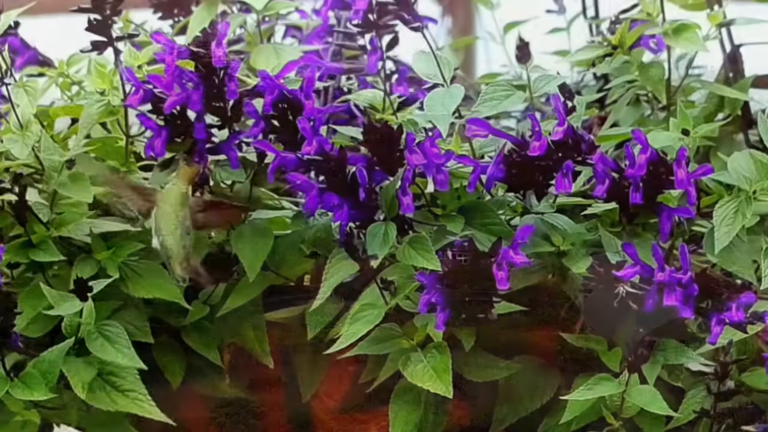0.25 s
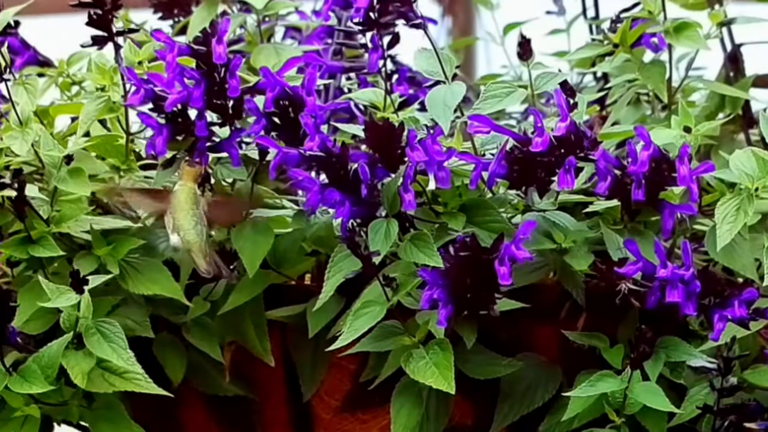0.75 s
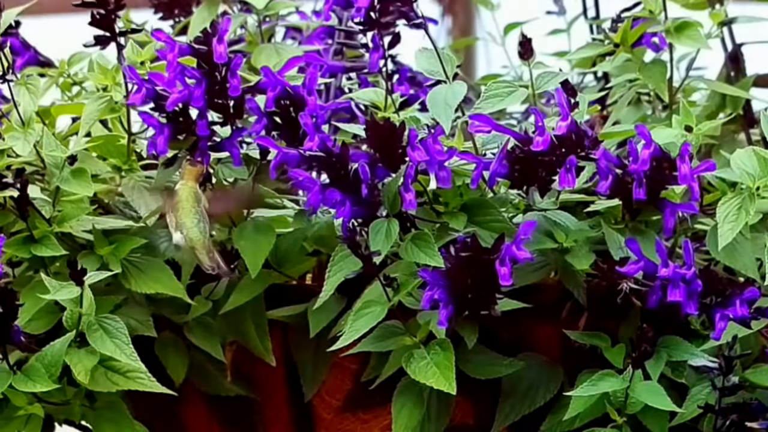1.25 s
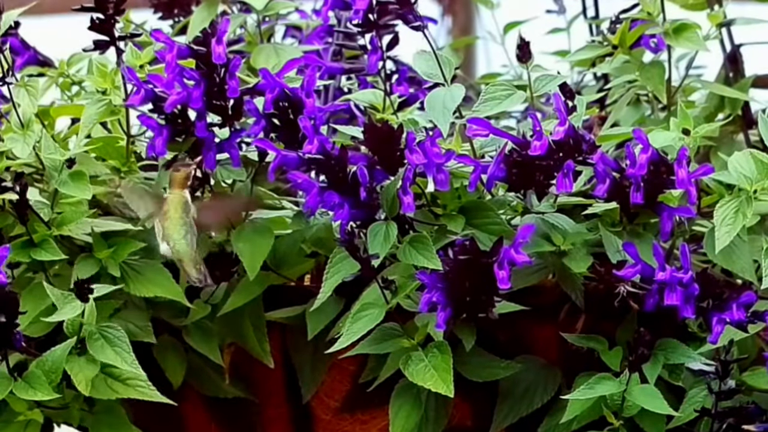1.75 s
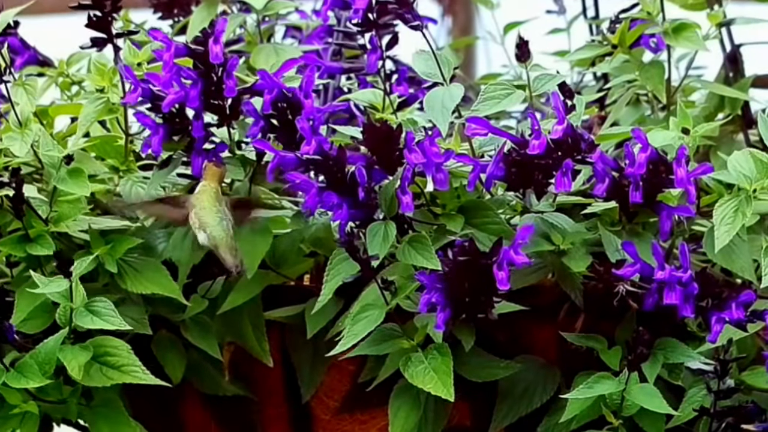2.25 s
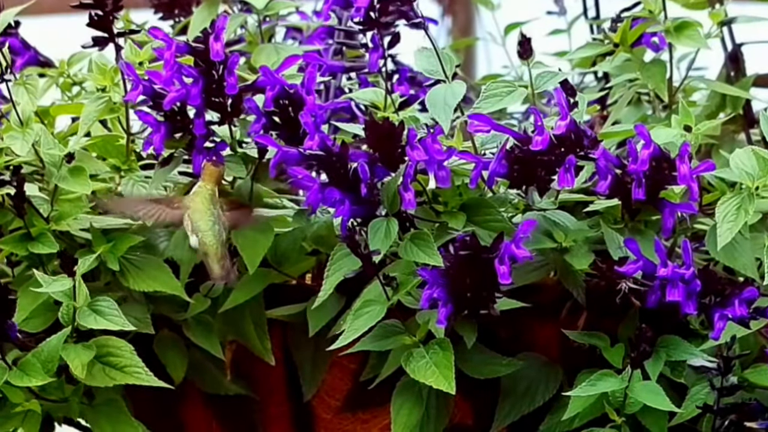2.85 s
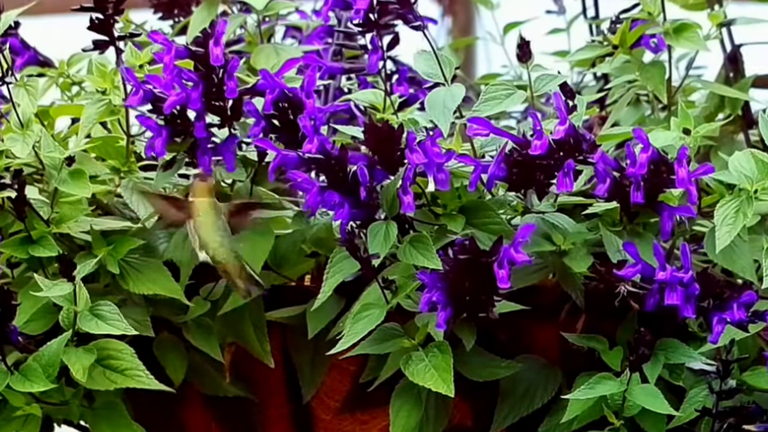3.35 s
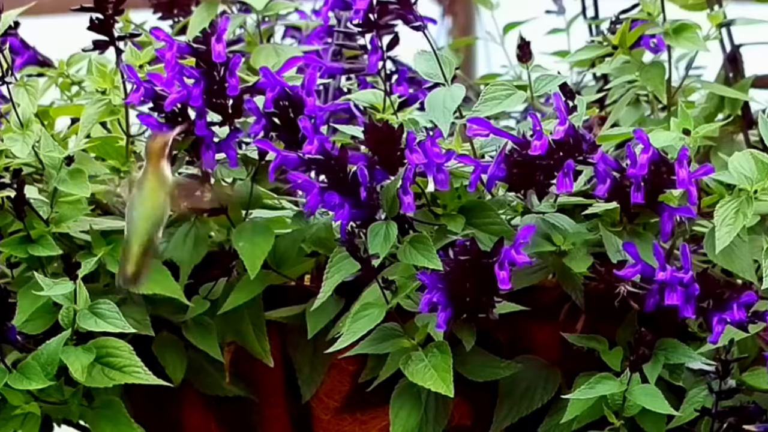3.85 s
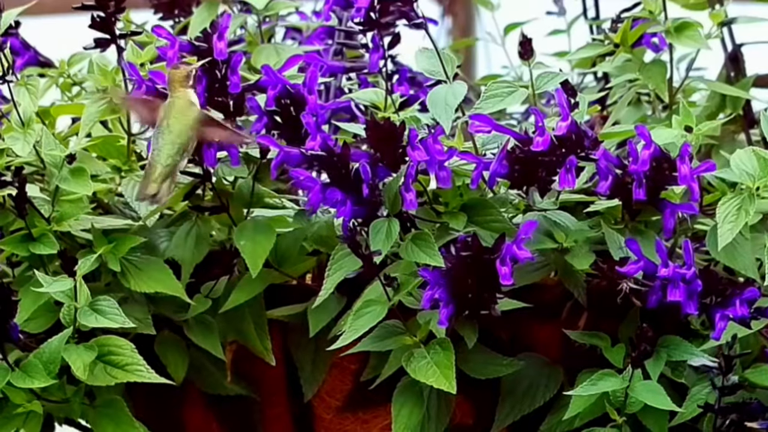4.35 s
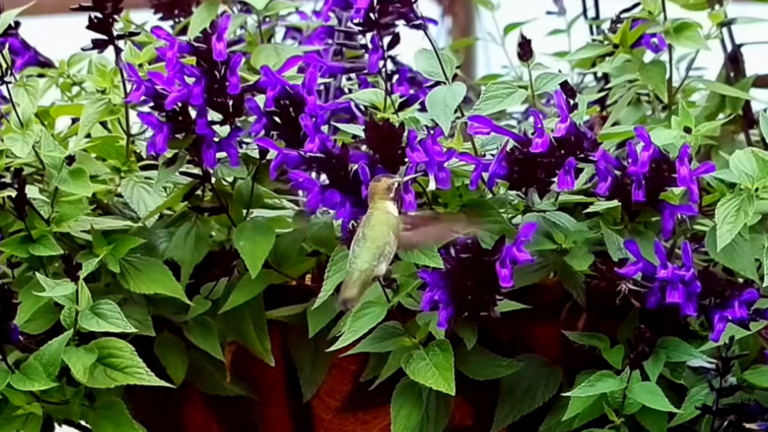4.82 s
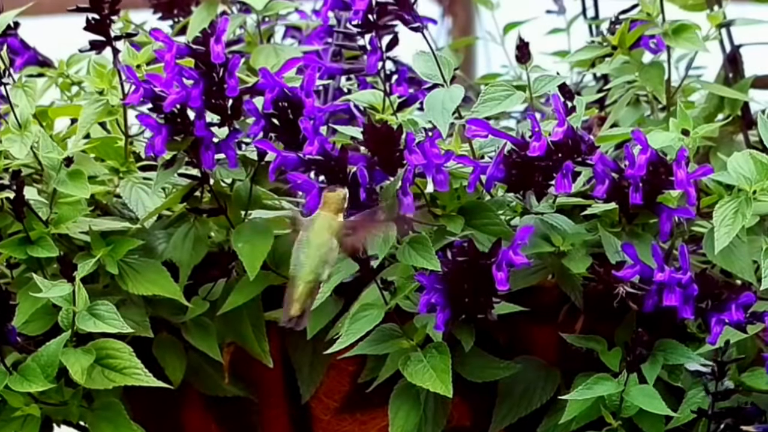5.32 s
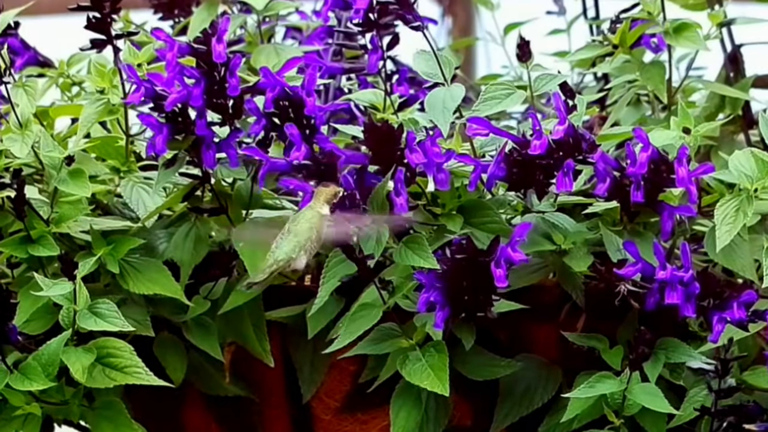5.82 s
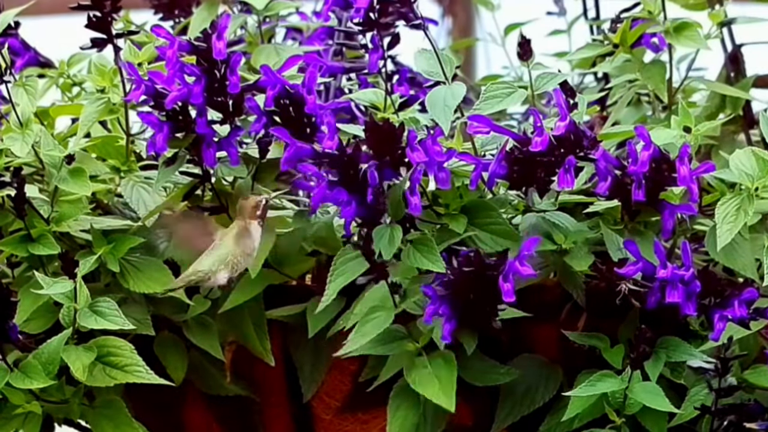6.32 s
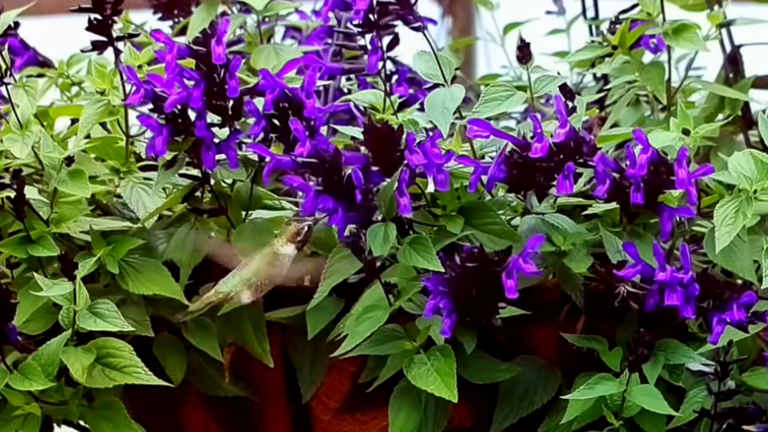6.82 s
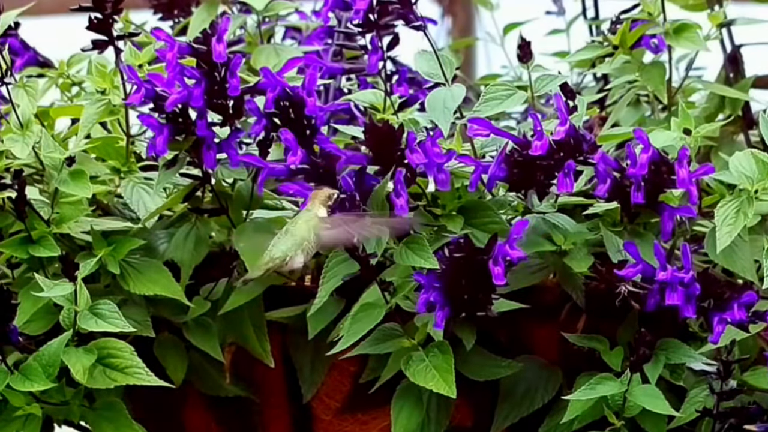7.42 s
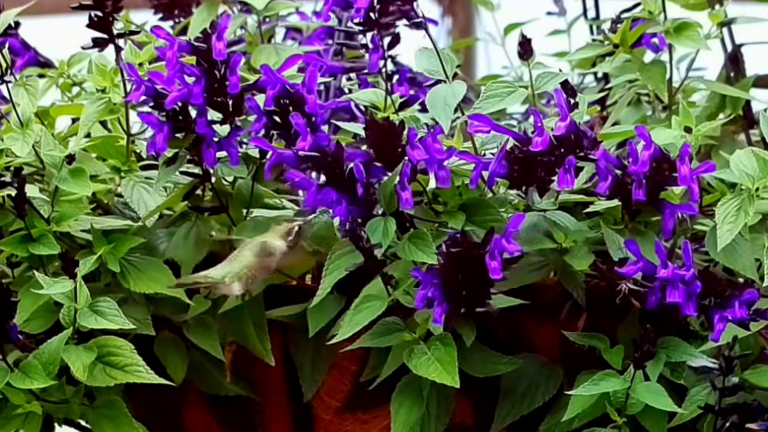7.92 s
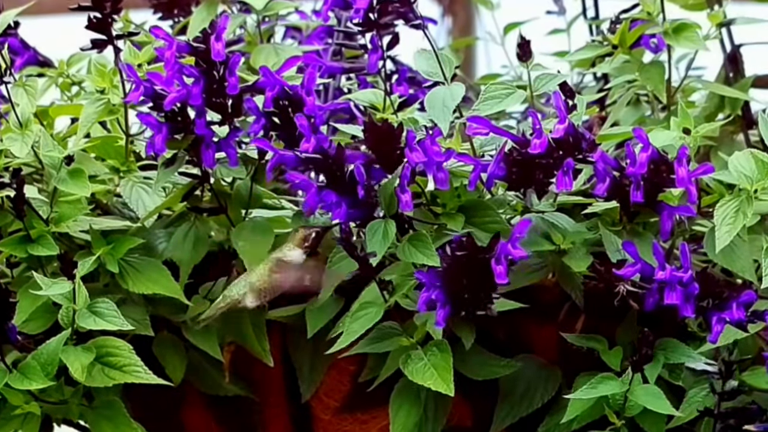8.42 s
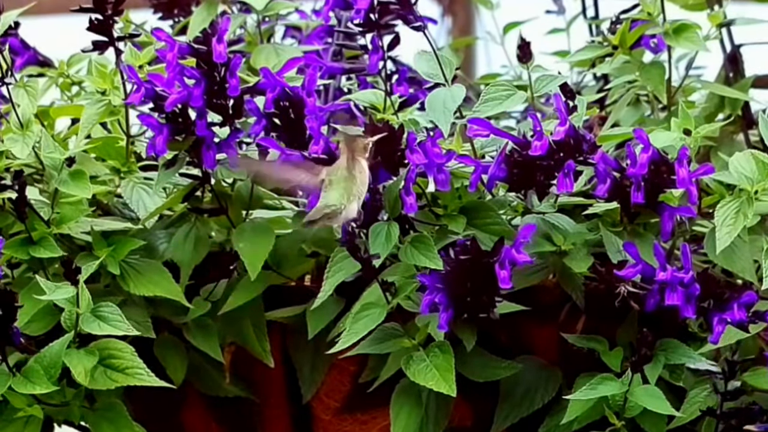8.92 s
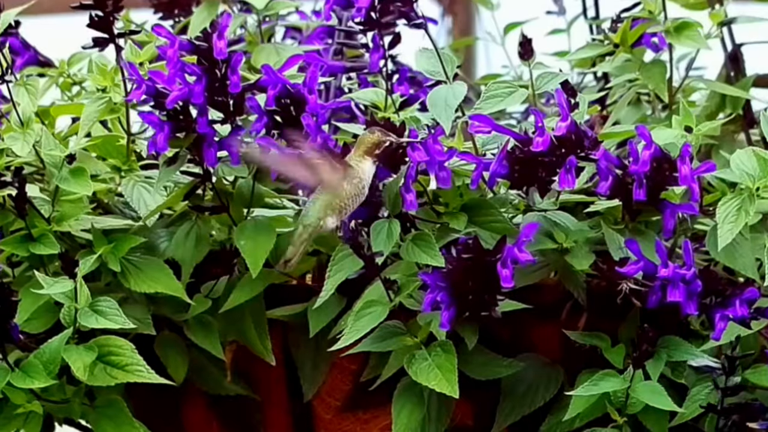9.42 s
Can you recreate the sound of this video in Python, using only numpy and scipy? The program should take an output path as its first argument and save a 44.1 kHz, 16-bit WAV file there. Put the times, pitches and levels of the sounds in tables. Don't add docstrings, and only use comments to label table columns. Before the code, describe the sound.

A hummingbird close among leaves gives five tiny, sharp, plunging chips about a quarter second apart over wide garden hiss. At one and a half seconds the hiss turns narrower and quieter, nearly empty but for faint distant peeps. From three seconds the bird sings in the centre: fast scratchy buzzes, dry clicks, rasps swelling into piercing squeaks, short whistles and doubled notes, with a light outdoor echo.

```python
import sys
import numpy as np
from scipy import signal
from scipy.fft import rfft, irfft, next_fast_len
from scipy.io import wavfile
from scipy.ndimage import uniform_filter1d, map_coordinates

SR = 44100
rng = np.random.default_rng(int(sys.argv[2]) if len(sys.argv) > 2 else 0)


def makeup_ratio(level_db):
    decades = np.asarray(level_db, float) / 20
    return 10 ** decades


def master(y):
    cut = np.clip(np.atleast_2d(y).T, -1, 1)
    pcm = np.round(cut * 32767)
    wavfile.write(sys.argv[1], SR, pcm.astype(np.int16))


N = 426447
SCENE_CHANGE_S = 1.5
MIDDLE_DB = -35
JOINED_S = 0.006

# start in seconds, end in seconds, early level in dB, late level in dB,
# opening pitch in Hz (of the low voice, for two voices).
BUZZES = [
    (3.15, 3.196, -44, -44.5, 7177),
    (3.2, 3.405, -31.5, -34, 7120),
    (3.447, 3.58, -33.5, -30, 6580),
    (3.752, 3.862, -40, -36.5, 6800),
    (4.07, 4.21, -37, -39, 6900),
    (4.21, 4.35, -35.5, -33.5, 7000),
    (4.517, 4.717, -35, -42.5, 6650),
    (4.717, 4.822, -43.5, -39, 6500),
    (6.7, 6.86, -33, -32, 6804),
    (7.03, 7.08, -32, -34.5, 6400),
]
SWELLS = [
    (3.581, 3.694, -30, -29, 6550),
    (3.862, 4.006, -31.5, -30.5, 6500),
    (4.35, 4.46, -28, -39.5, 6900),
    (6.861, 6.98, -39.5, -29, 6510),
    (7.08, 7.146, -40, -41, 6300),
    (7.15, 7.276, -32, -33.5, 6115),
    (7.318, 7.453, -34, -35, 6300),
    (7.455, 7.586, -27.5, -31.5, 6000),
]
FRAYED_BUZZES = [
    (4.93, 5.12, -54.5, -53, 6750),
    (7.66, 7.745, -43.5, -38, 6840),
    (7.745, 7.87, -38.5, -40, 6420),
    (7.89, 7.975, -41, -38.5, 5850),
    (8.06, 8.2, -50, -49, 6800),
]
RASPS = [
    (1.63, 1.71, -58, -55.5, 6700),
    (5.795, 5.935, -39.5, -32, 6380),
    (6.28, 6.383, -45, -39, 6430),
    (6.383, 6.428, -30, -35, 7030),
    (8.62, 8.78, -51, -34.5, 6600.19),
    (8.78, 8.85, -25.5, -44.5, 6850),
    (9.02, 9.131, -37, -39, 6900),
    (9.131, 9.176, -30.5, -28, 8050),
    (9.54, 9.615, -30, -39.5, 6500),
    (9.615, 9.675, -43.5, -30, 6900),
]
BURSTS = [
    (5.155, 5.185, -38.5, -53, 6000),
    (5.925, 5.963, -36.5, -21.5, 6000),
    (6.415, 6.457, -32, -22, 6000),
    (9.16, 9.205, -30, -19.5, 6000),
]
WHISTLES = [
    (5.19, 5.27, -45, -41, 8700.5),
    (5.278, 5.312, -30.5, -22.5, 8899.5),
    (5.957, 5.975, -24, -36, 9680),
    (6.447, 6.471, -19.5, -32, 9540),
    (7.728, 7.755, -30, -41, 8540),
    (9.195, 9.215, -19.5, -30, 9760),
]
WHISTLE_TAILS = [
    (5.975, 6.06, -40, -42.5, 8200),
    (6.471, 6.531, -30.5, -52, 8370),
    (8.285, 8.365, -37.5, -40.5, 9430),
    (9.215, 9.285, -34.5, -51, 8920),
]
TRILLS = [
    (5.31, 5.346, -29, -46, 8560),
    (5.346, 5.42, -37, -51, 8390),
    (5.42, 5.586, -50, -49, 8200),
]
CLOSE_DUETS = [
    (5.67, 5.795, -47.5, -44, 4530),
    (6.17, 6.29, -52, -41, 4550.5),
    (8.915, 9.035, -42, -38.5, 4743),
    (9.42, 9.545, -44.5, -36.5, 4420),
]
WIDE_DUETS = [
    (5.12, 5.185, -42, -38, 3484),
    (8.225, 8.29, -53, -35, 2706),
]

# level in dB of an
BUZZ_MANNER = dict(attack_s=0.0077, release_s=0.01416, edge_db=15.5, rest_hz=6300, settle_s=.6, colours=[(-7.5, -0.21),
               (-0.2, -.005)])
SWELL_MANNER = dict(attack_s=.012, release_s=0.017, edge_db=13.5, rest_hz=6300, settle_s=.6, colours=[(-9.5, -0.34),
                (0.09, -.001)])
FRAYED_MANNER = dict(attack_s=0.0031, release_s=0.012, edge_db=10, rest_hz=6700, settle_s=0.24, colours=[(-9.5, -.1),
                 (0.63, 0.0076)])
RASP_MANNER = dict(attack_s=0.0066, release_s=0.0023, edge_db=9, rest_hz=7130, settle_s=0.24, colours=[(-7.5, -.1),
               (0.6, -.001)])
BURST_MANNER = dict(attack_s=.003, release_s=0.015, edge_db=9, rest_hz=6000, settle_s=.2, colours=[(-5.5, -0.76),
                (0.2743, -.001)])
WHISTLE_MANNER = dict(attack_s=0.0075, release_s=0.0027, edge_db=9, rest_hz=8200, settle_s=0.11, colours=[(-26.5, -0.44),
                  (-17, -0.33)])
TAIL_MANNER = dict(attack_s=0.0041, release_s=.018, edge_db=9, rest_hz=8020, settle_s=0.037, colours=[(-27.5, -0.31),
               (-11, -.3)])
TRILL_MANNER = dict(attack_s=0.0029, release_s=0.0096, edge_db=10, rest_hz=9800, settle_s=0.18, colours=[(-24, -1.56),
                (-19.5, -0.75)])
# high voice in Hz, sum tones in dB.
CLOSE_MANNER = dict(attack_s=0.0076, release_s=.011, edge_db=9, rest_hz=4500, settle_s=.08, colours=[(5248.5, 12.5),
                (-0.5, -0.26)])
WIDE_MANNER = dict(attack_s=0.013, release_s=.004, edge_db=3.5, rest_hz=3770, settle_s=0.06, colours=[(5210, 3),
               (5.9, 0.17)])

# time in seconds, peak level in dB, ring in Hz.
CLICK_EVENTS = [(3.0833, -39, 6370), (3.1155, -30.5, 7670), (3.1494, -32, 6800), (4.0896, -24, 6700),
                (4.124, -19, 6940), (4.1715, -16, 6910), (4.5262, -22.5, 6390), (4.554, -38, 6240),
                (4.8, -19, 6540), (4.8197, -28.5, 6650), (5.0059, -41, 6570), (5.048, -39, 6500),
                (5.899, -18.5, 8520), (6.3868, -23.5, 6720), (6.6457, -31, 6800), (6.6795, -23.5, 6410),
                (6.713, -25.5, 6720), (7.0326, -24.5, 6600), (7.8818, -13.5, 4030), (7.9584, -23.5, 7270),
                (8.4588, -32.5, 4740), (8.6544, -32, 6900), (9.1364, -14, 8130), (9.654, -21.5, 8500)]
# start in seconds, length in seconds, start Hz, end Hz, level in dB.
SOFT_NOTES = [(0.688, 0.051, 2310, 2270, -63.5), (0.849, 0.054, 2300, 2480, -57),
              (0.973, 0.055, 3540, 3460, -51), (1.108, 0.035, 8380, 8280, -49.5),
              (1.66, 0.04, 9500, 9700, -52.5), (2.462, 0.071, 6540, 6900, -52),
              (4.643, 0.094, 2560, 2940, -55.5), (4.736, 0.039, 2307, 2500, -52.5),
              (4.783, 0.037, 2376, 2350, -51), (7.891, 0.037, 2303, 2414, -49.5),
              (8.098, 0.025, 12430, 12200, -55)]

# start in seconds, peak in dB, time stretch, left-right in dB, air puff in dB.
CHIP_EVENTS = [
    (0.2356, -8, 0.99, -0.5, -21),
    (0.492, -8.5, 1, -1, -10.5),
    (0.767, -7, 1, -1.0, -28),
    (1.0175, -7, 1, -1.5, -18),
]
EARLIER_CHIP = (-.012, -12, 1, -1.5, -20)
BREATHY_CHIPS = [
    (1.2869, -7.5, 0.96, -1.3, -5.5),
]
# time in ms, pitch in Hz, level in dB.
CHIP_COURSE = [(0, 9270, -33.5), (.6, 8800, -12), (3.2, 8100, -5.5), (5.5, 7100, -5.5), (7.3, 5300, -5),
               (9, 4640, -15), (10.8, 3100, -14.5), (12, 3800, -42)]

# frequency in Hz, level in dB.
THROAT_DB = [(2000, -35), (3200, -19.5), (4400, -8.5), (4900, -1), (9000, -2.5), (13000, -6.5),
             (16000, -14)]
SWELL_THROAT_DB = [(4200, 0), (7300, -0.2), (8100, -8), (9500, -7.5), (10500, 1), (15000, 3.5)]
BREATH_DB = [(2400, -40), (3000, -9.5), (4400, -3.5), (4900, -3.5), (7800, 3), (9200, -6), (10500, -47)]
FIZZ_DB = [(8200, -71), (9200, 2), (10300, -3.5), (13000, 0.5), (14200, -15), (16000, -5)]
FIRST_MIC_DB = [(300, -49.5), (1800, -35), (2300, -7), (12000, 3.5), (13500, -15.5), (16000, -41)]
NEAR_AIR_DB = [(18, -17), (30, -28), (59, -45.5), (988, -7.5), (2830, -0.5), (5590, 1.5), (9970, -1.5),
               (16000, -15)]
FAR_AIR_DB = [(18, -116), (30, -49), (649, -30.5), (1040, -18), (1720, -9), (2600, -4), (3980, -4),
              (16000, -16)]

# time in seconds, level in dB.
FAR_LEVEL_DB = [(1.5, -65.5), (1.84, -68.5), (3.07, -67), (3.32, -64.5), (5.64, -63.5), (6.101, -62.5),
                (6.65, -60.5), (7.98, -60), (8.53, -61.5), (9.35, -61.5), (9.67, -61)]
# frequency in Hz, 60 dB decay in seconds.
LEAVES_T60_S = [(2000, 0.3), (5000, 0.098), (8000, 0.14), (11000, .12), (14000, 0.16)]
# frequency in Hz, 60 dB decay in seconds.
YARD_T60_S = [(2000, 0.55), (7000, 0.43), (14000, 0.055)]
# delay in ms, size.
HOUSING_COPIES = [(1.124, -0.09), (1.212, 0.1), (1.448, 0.1), (1.804, 0.07), (1.994, -0.07), (2.116, 0.06),
                  (3.004, -0.08), (3.332, 0.08), (3.508, 0.07)]


def buzz(tables, rate_hz, jitter, sharp, airy, white):
    gain, hz, upper_db, scatter = syllables(tables)
    scatter = np.abs(scatter)
    count = beats(rate_hz, jitter)
    jump = rng.standard_normal(N // 20)[count.astype(int)]
    bend = scatter * (0.3 * jump + 0.5 * wobble(120) + 0.4 * wobble(900))
    tone = spin(hz * np.exp(bend)).real
    upper = spin(1.8 * hz * np.exp(0.37 * bend + 0.036 * wobble(1200))).real
    air_share = np.clip(airy * scatter, 0.03, 0.9)
    low = np.sqrt(2 - 2 * air_share) * tone + np.sqrt(air_share) * unit(coloured(white[0], BREATH_DB))
    high = 1.66 * upper + 1.27 * unit(coloured(white[1], FIZZ_DB))
    gate = throb(count, sharp, size_db=2.0) * (1 - air_share) + air_share
    return gain * makeup_ratio(2.3 * wobble(55)) * gate * (low + makeup_ratio(upper_db) * high)


def whistle(tables, sharp, dip, waver, leak):
    gain, hz, first_db, third_db = syllables(tables)
    count = beats(58, jitter=0.08)
    skirt = hoarse(leak)
    z = spin(hz / 2 * (1 + waver * wobble(450) + dip * np.sin(2 * np.pi * count)))
    voice = makeup_ratio(first_db) * z + z ** 2 + makeup_ratio(third_db - 4.5) * z ** 3
    return np.sqrt(2) * gain * throb(count, sharp, size_db=1.5) * (skirt * voice).real


def duet(tables, low_db):
    gain, low_hz, high_hz, sums_db = syllables(tables)
    low = makeup_ratio(low_db + 4 * wobble(60)) * spin(low_hz * (1 + 0.011 * wobble(400)))
    high = makeup_ratio(4 * wobble(60)) * spin(high_hz * (1 + 0.013 * wobble(450)))
    pair = low + high
    pair = pair / (1 + 0.086 * np.abs(pair))
    skirt = hoarse(0.3)
    sums = unit((skirt * pair ** 2).real) + makeup_ratio(-14) * unit((skirt * pair ** 3).real)
    return gain * (unit(pair.real) + makeup_ratio(sums_db) * sums)


def clicks():
    out = np.zeros(N + SR)
    t = np.arange(SR // 50) / SR
    decay = makeup_ratio(-60 * t / 0.013)
    for s, db, hz in CLICK_EVENTS:
        burst = 0.6 * min(hz / 6500, 1) ** 2 * decay * rng.standard_normal(len(t))
        ring = decay * np.sin(2 * np.pi * hz * t)
        out[round(s * SR):][:len(t)] += makeup_ratio(db) * (burst + ring)
    return out[:N]


def chips():
    lead = SR // 10
    dry = np.zeros((2, N + lead))
    ms, hz, db = np.transpose(CHIP_COURSE)
    for s, peak_db, stretch, pan_db, puff_db in [EARLIER_CHIP, *CHIP_EVENTS, *BREATHY_CHIPS]:
        t_ms = np.arange(0, ms[-1] * stretch, 1000 / SR) / stretch
        z = spin(np.interp(t_ms, ms, hz))
        tone = (z + makeup_ratio(-9) * z * z).imag
        puff = makeup_ratio(puff_db) * rng.standard_normal(SR // 20)[:len(t_ms)]
        side_tone = makeup_ratio(-15 - 9 * t_ms) * np.sin(2 * np.pi * 11.3 * t_ms)
        call = makeup_ratio(peak_db - 4.0 + np.interp(t_ms, ms, db)) * (tone + puff + side_tone)
        call = np.pad(call, (0, SR // 2)) * makeup_ratio([[pan_db / 2], [-pan_db / 2]])
        heard = call + makeup_ratio(-5.0) * echoes(call, LEAVES_T60_S, delay_s=0.00028, wide=0.34)
        dry[:, round(s * SR) + lead:][:, :heard.shape[1]] += heard
    return dry[:, lead:]


def notes():
    out = np.zeros(N)
    waver = wobble(120)
    broken = makeup_ratio(5 * wobble(150))
    for s, length_s, start_hz, end_hz, db in SOFT_NOTES:
        i, n = round(s * SR), round(length_s * SR)
        hz = np.linspace(start_hz, end_hz, n) + 70 * waver[i:i + n]
        out[i:i + n] += makeup_ratio(db + 2.0) * broken[i:i + n] * np.sqrt(np.hanning(n)) * spin(hz).real
    return out


def air():
    t = np.arange(N) / SR
    near = np.clip((SCENE_CHANGE_S - t) / 0.035, 0, 1)
    mid, side = coloured(rng.standard_normal((2, N)), NEAR_AIR_DB)
    wide = makeup_ratio(-56) * np.array([mid + 0.42 * side, mid - 0.43 * side]) / np.std(mid)
    far_db = np.interp(t, *np.transpose(FAR_LEVEL_DB)) + 5.5
    single = makeup_ratio(far_db) * unit(coloured(rng.standard_normal(N), FAR_AIR_DB))
    return near * wide + (1 - near) * single


def recorder_grit(song):
    level = uniform_filter1d(np.abs(song), size=300)
    spectrum = [(8, -75), (22, -3), (300, -0.5), (1500, 0.5), (4000, -41)]  # Hz, dB
    return makeup_ratio(-32.5) * coloured(level * rng.standard_normal(N), spectrum)


def housing(x):
    m = next_fast_len(N + 8192)
    f = np.fft.rfftfreq(m, 1 / SR)
    copies = sum(1.7 * size * np.exp(-2j * np.pi * f * ms / 1000) for ms, size in HOUSING_COPIES)
    return irfft(rfft(x, m) * np.exp(copies), m)[:N]


def echoes(x, t60_s, delay_s, wide):
    hz, t, z = signal.stft(rng.standard_normal((2, SR // 2)), SR, nperseg=128)
    fade = makeup_ratio(-60 * t / along(t60_s, hz)[:, None])
    mid, side = signal.istft(z * fade, SR, nperseg=128)[1]
    tail = np.array([mid + wide * side, mid - wide * side]) * (np.arange(len(mid)) > delay_s * SR)
    return signal.fftconvolve(np.atleast_2d(x), tail / np.linalg.norm(mid), axes=1)[:, :x.shape[-1]]


def narrowed(x):
    t = np.arange(N) / SR
    swelling = sum((t > s) & (t <= end) for s, end, *_ in SWELLS).clip(0, 1) * 1.0
    inside = uniform_filter1d(swelling, size=900)
    return x * (1 - inside) + coloured(x * inside, SWELL_THROAT_DB)


def sung(rows, attack_s, release_s, edge_db, rest_hz, settle_s, colours, beside=()):
    tables = []
    starts, ends = np.transpose([*rows, *beside])[:2]
    for s, end, early_db, late_db, hz in rows:
        follows = np.abs(ends - s).min() < JOINED_S
        leads = starts[np.abs(starts - end) < JOINED_S]
        length = (leads[0] if len(leads) else end) - s
        since = np.sort(np.clip([0, attack_s, length / 2, length - release_s, length], 0, length))
        first_db = early_db - edge_db * (not follows)
        last_db = late_db - edge_db * (not len(leads))
        db = np.array([first_db, early_db, (early_db + late_db) / 2, late_db, last_db])
        pitch_hz = rest_hz + (hz - rest_hz) * np.exp(-since / settle_s)
        tint = [middle + slope * (db - MIDDLE_DB) for middle, slope in colours]
        tables.append(np.transpose([s + since, db, pitch_hz, *tint]))
    return tables


def in_order(*groups):
    return sorted(sum(groups, []), key=lambda rows: rows[0][0])


def syllables(tables):
    t = np.arange(N) / SR
    s, db, *cols = np.transpose(np.concatenate(tables))
    sounding = sum((t > rows[0][0]) & (t <= rows[-1][0]) for rows in tables) * 1.0
    gain = makeup_ratio(np.interp(t, s, db)) * uniform_filter1d(sounding, size=130)
    return [gain] + [np.interp(t, s, c) for c in cols]


def beats(rate_hz, jitter):
    return np.cumsum(rate_hz * np.exp(jitter * wobble(rate_hz / 2))) / SR


def throb(count, sharp, size_db):
    size = rng.standard_normal(N // 20)[count.astype(int)]
    return unit(np.abs(np.sin(np.pi * count)) ** sharp * makeup_ratio(size_db * size))


def hoarse(depth):
    return (1 + depth * (wobble(1800) + 1j * wobble(1800))) / np.sqrt(1 + depth ** 2)


def patchy(depth_db):
    z = signal.stft(rng.standard_normal((2, N)), nperseg=256)[2]
    field = uniform_filter1d(rng.standard_normal(z.shape), size=5, axis=1)
    field = uniform_filter1d(field, size=11, axis=2)
    return signal.istft(z * makeup_ratio(depth_db * unit(field)), nperseg=256)[1][:, :N]


def spin(hz):
    return np.exp(2j * np.pi * np.cumsum(hz) / SR)


def wobble(rate_hz):
    coarse = np.arange(0, N + 4, 4)
    curve = map_coordinates(rng.standard_normal(N // 20), [coarse * rate_hz / SR])
    return np.interp(np.arange(N), coarse, curve)


def unit(x):
    return x / np.sqrt(np.mean(x ** 2) + 1e-20)


def along(points, hz):
    f, v = np.transpose(points)
    return np.interp(np.log(hz + 1), np.log(f + 1), v)


def coloured(x, points):
    m = next_fast_len(N + 8192)
    return irfft(rfft(x, m) * makeup_ratio(along(points, np.fft.rfftfreq(m, 1 / SR))), m)[..., :N]


def scene():
    white = patchy(depth_db=3.5)
    even = in_order(sung(BUZZES, **BUZZ_MANNER, beside=SWELLS),
                    sung(SWELLS, **SWELL_MANNER, beside=BUZZES),
                    sung(FRAYED_BUZZES, **FRAYED_MANNER))
    even = buzz(even, 450, jitter=0.08, sharp=1.5, airy=2.1, white=white)
    harsh = buzz(sung(RASPS, **RASP_MANNER), 520, jitter=0.33, sharp=1.7, airy=2.0, white=white)
    bursts = buzz(sung(BURSTS, **BURST_MANNER), 900, jitter=0.4, sharp=3.2, airy=2.66, white=white)
    trill = whistle(sung(TRILLS, **TRILL_MANNER), sharp=1.5, dip=0.008, waver=0.012, leak=0.22)
    plain = in_order(sung(WHISTLES, **WHISTLE_MANNER), sung(WHISTLE_TAILS, **TAIL_MANNER))
    plain = whistle(plain, sharp=0.26, dip=0.0029, waver=0.023, leak=0.5)
    close = duet(sung(CLOSE_DUETS, **CLOSE_MANNER), low_db=1.5)
    wide = duet(sung(WIDE_DUETS, **WIDE_MANNER), low_db=1)
    song = coloured(narrowed(even) + harsh + clicks(), THROAT_DB)
    song = song + bursts + trill + plain + close + wide
    song = housing(song + notes())
    song = song + makeup_ratio(-11.5) * echoes(song, YARD_T60_S, delay_s=0.0024, wide=0)[0]
    return coloured(chips(), FIRST_MIC_DB) + song + recorder_grit(song) + air()


def top_cut(x):
    return signal.sosfilt(signal.butter(12, 16330, fs=SR, output="sos"), x)


def record(dry):
    mix = coloured(dry, [(15900, 0), (16050, -90)])
    return top_cut(mix)


dry = scene()
out = record(dry)
master(out)
```